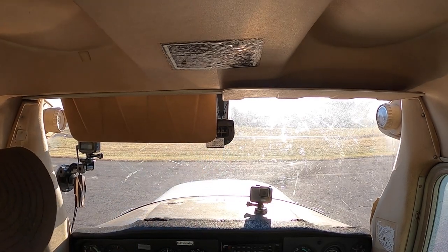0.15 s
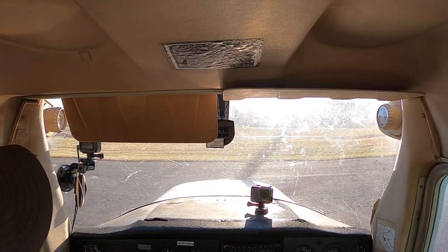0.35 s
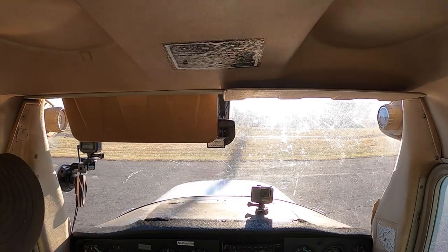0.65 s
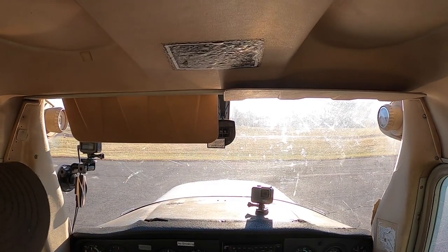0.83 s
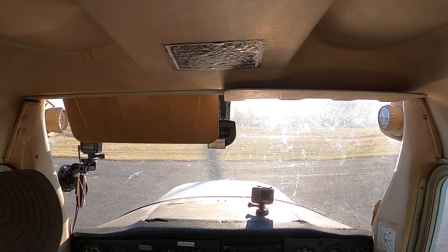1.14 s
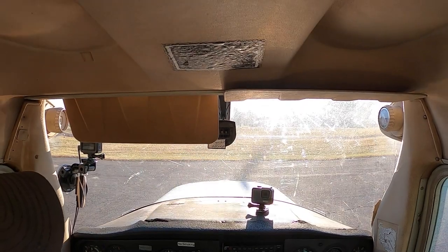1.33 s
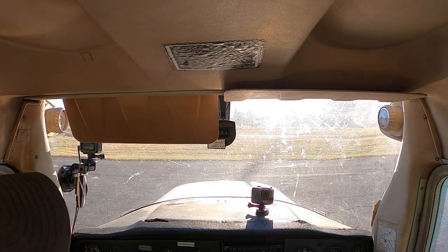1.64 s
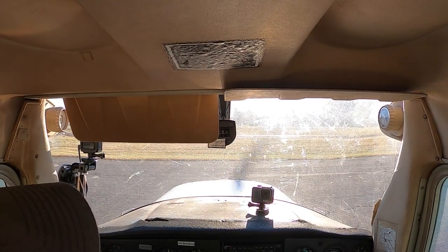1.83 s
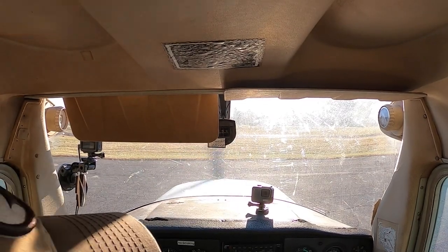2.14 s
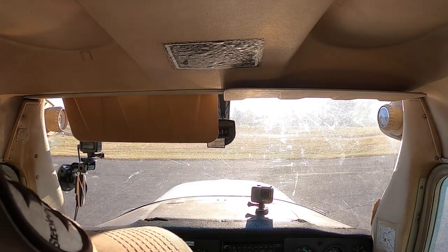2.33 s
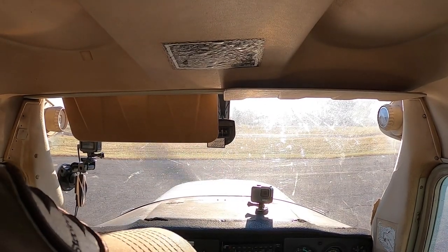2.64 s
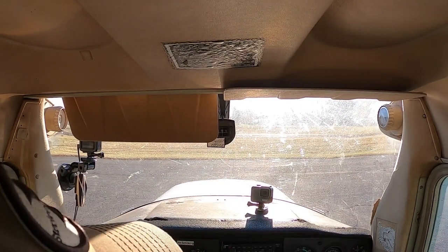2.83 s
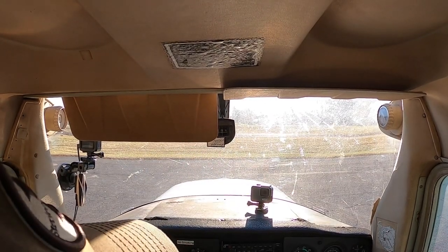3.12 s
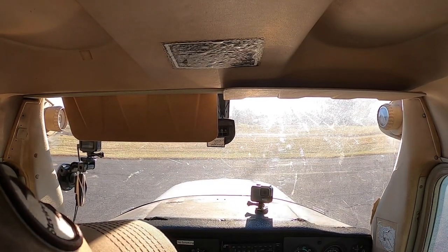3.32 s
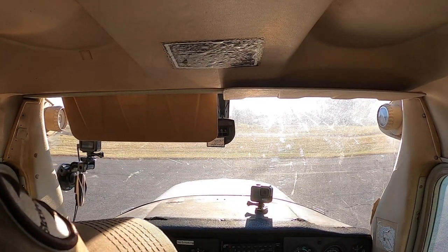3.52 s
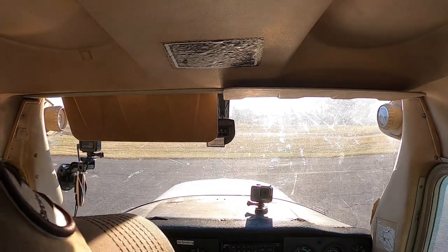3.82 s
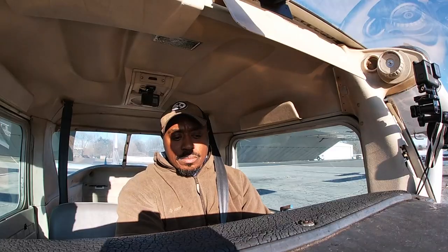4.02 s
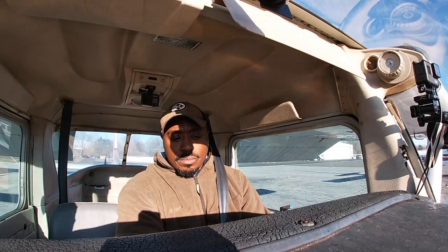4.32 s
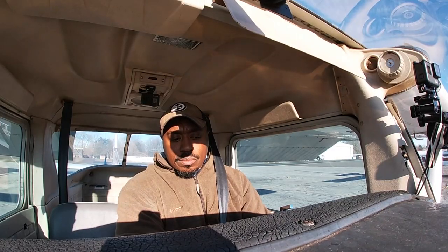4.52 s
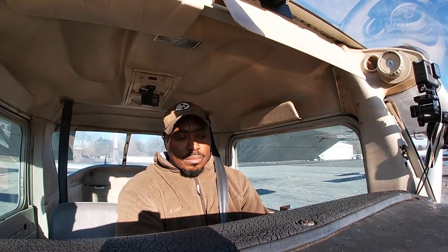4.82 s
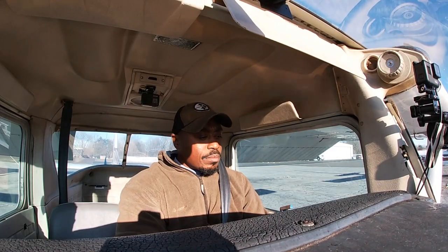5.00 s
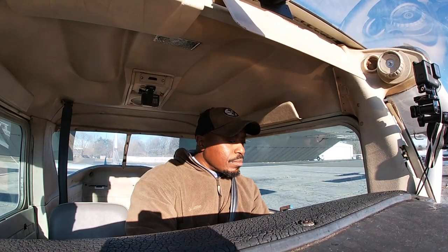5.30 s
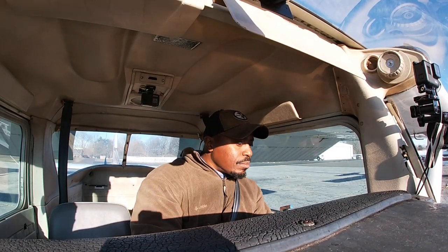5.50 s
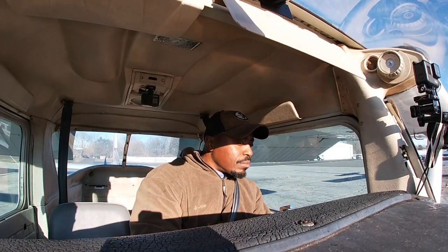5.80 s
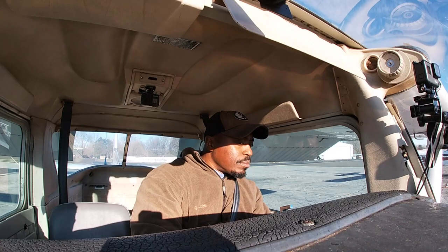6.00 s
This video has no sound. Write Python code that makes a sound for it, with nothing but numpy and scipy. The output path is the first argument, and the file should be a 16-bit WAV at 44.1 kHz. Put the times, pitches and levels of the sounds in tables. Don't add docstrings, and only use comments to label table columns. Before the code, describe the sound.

Heard from inside a small plane's cabin, a brief starter grind gives way at once to uneven, booming first firings with sharp metal clatter. Within a second the engine catches and revs up, the separate thumps merging into a low throbbing drone. It rises gradually to a steady idle with breathy exhaust and propeller wash, faint trim buzzes and a small relay tick about every one and a half seconds. The microphone is close and levelled.

```python
import sys
import numpy as np
from scipy import signal
from scipy.fft import rfft, irfft, next_fast_len
from scipy.io import wavfile
from scipy.ndimage import uniform_filter1d, map_coordinates

SR = 44100
rng = np.random.default_rng(int(sys.argv[2]) if len(sys.argv) > 2 else 0)


def gain_from_db(level_db):
    decades = np.asarray(level_db, float) / 20
    return 10 ** decades


def output_pcm(signal):
    pcm = np.clip(np.atleast_2d(signal).T, -1, 1) * 32767
    wavfile.write(sys.argv[1], SR, np.round(pcm).astype(np.int16))


N = 271215


def drone(rate_hz, turn):
    order_paths = {1: [(12, -38.5), (22, -23.5), (24, -18), (27.6, -37.5), (35.6, -27.5), (40.8, -34),
                   (43.5, -20), (51.5, -25)], 2: [(24, -22), (39, -30), (48, -41), (58, -23.5), (61, -18),
                   (72, -12), (90, -14.5), (103, -14.5)], 3: [(52, -16), (64, -24.5), (80, -20),
                   (102, -40.5), (120, -19.5), (135, -31.5), (149, -26.5), (155, -35)], 4: [(48, -27.5),
                   (77, -33), (110, -22.5), (146, -38.5), (162, -31), (176, -42.5), (196, -31.5),
                   (206, -36)]}
    uneven_paths = {5 / 4: [(36, -33), (43, -49.5), (53, -37), (62.5, -27), (64.5, -31)], 7 / 4: [(50, -40),
                    (58, -33.5), (80, -28.5), (85, -39.5), (89.5, -28.5)], 5: [(150, -40), (180, -43.5),
                    (200, -32), (220, -48.5), (234, -41), (245, -51.5), (256, -37)], 6: [(170, -48.5),
                    (270, -47), (284, -35.5), (298, -56), (309, -40)], 8: [(300, -42.5), (380, -55),
                    (404, -50), (411, -41.5)]}
    # frequency in Hz, level in dB rms.
    quarter_path = [(10, -54.5), (25, -41.5), (60, -43), (120, -44), (200, -44), (330, -62.5)]
    lead_rad = {1: 0, 5 / 4: -2, 7 / 4: 1.6, 2: -.4, 3: 0, 4: .7, 5: -2.7, 6: 2, 8: 2.5}
    floor_hz, floor_width_hz = 151, 3
    slip = 0.7 * np.arctan((3 * rate_hz - floor_hz) / floor_width_hz)
    out = np.zeros(N)
    for order, path in order_paths.items():
        level_db = along(path, order * rate_hz) + 0.3 * order * wobble(14)
        phase = order * turn + lead_rad[order] + 0.028 * order * wobble(11)
        if order == 3:
            phase = phase - slip
        out += gain_from_db(level_db) * np.cos(phase)
    for order, path in uneven_paths.items():
        level_db = along(path, order * rate_hz) + 1.5 * wobble(5.5)
        phase = order * turn + 0.2 * wobble(3) + lead_rad[order]
        out += gain_from_db(level_db) * np.cos(phase) * fade(0.72, 0.91)
    for quarter in range(1, 31):
        if quarter in (4, 5, 7, 8, 12, 16, 20, 24):
            continue
        level_db = along(quarter_path, quarter / 4 * rate_hz) + 4 * wobble(2.7)
        phase = quarter / 4 * turn + 0.8 * wobble(2) + 7 * rng.random()
        out += gain_from_db(level_db) * np.cos(phase)
    lean = np.clip(0.2 + 0.15 * wobble(9), 0, 0.7) * fade(1.8, 3.2)
    dip = 1 - lean * (np.exp(4 * (np.cos(turn / 4 + 1) - 1)) - 0.2)
    return np.sqrt(2) * out * dip


def roar(turn):
    # time in seconds, level in dB over the first idle.
    load = [(.6, -1), (1.2, 0.5), (1.9, 1.5), (2.8, 3), (3.4, 3), (4.2, 4.5), (4.8, 6.5), (5.5, 6.5),
            (6.15, 6.5)]
    load_db, = curves(load)
    shared = wobble(5.1)
    puff = 1 + 0.12 * np.cos(turn - 1.2) + 0.16 * np.cos(2 * turn) + 0.02 * np.cos(turn / 4)
    low = exhaust(load_db, shared) + rumble(load_db)
    flow = puff * low + np.sqrt(puff) * propwash(load_db, shared) + leak(load_db, shared)
    return fade(0.25, 0.65) * flow


def exhaust(load_db, shared):
    # frequency in Hz, level in dB per Hz.
    spectrum = [(150, -44), (260, -9), (366, -3), (477, -7), (515, -6), (724, -12), (795, -18), (859, -12),
                (1400, -22), (2000, -31), (2600, -62.5), (4400, -120)]
    # frequency in Hz, width in Hz, level in dB above the roar.
    panels = [(521, 30, 4), (718, 25, 5.5), (865, 45, 3.5), (1400, 60, 4)]
    # centre in seconds, half length in seconds, lift in dB.
    surges = [
        (.43, .09, 17),
        (0.664, .04, 2.5),
        (.8, 0.11, 9),
        (1.556, .12, 3),
    ]

    def panel_gain(f):
        return 1 + sum((gain_from_db(db) - 1) / (1 + (2 * (f - c) / w) ** 2) for c, w, db in panels)

    surge_db = sum(swell(*row) for row in surges)
    level_db = -37.5 + load_db + surge_db
    bright_db = 0.37 - surge_db
    jet = unit(filtered(noise(spectrum, patchy_db=-0.54), panel_gain))
    high = filtered(jet, lambda f: 1 / (1 + (700 / (f + 1)) ** 4))
    jet = jet + (gain_from_db(bright_db) - 1) * high
    return jet * gain_from_db(level_db + 0.053 * shared + 0.11 * wobble(60))


def rumble(load_db):
    # frequency in Hz, level in dB per Hz.
    airframe = [(2, -12), (24, -3), (60, 12), (130, 11), (175, -6), (230, -32.5), (400, -120)]
    # frequency in Hz, level in dB per Hz.
    floor = [(90, -120), (150, -7), (200, 0.5), (280, -9.5), (350, -11.5), (500, -120)]
    # time in seconds, rumble level in dB.
    settling = [(.45, -16.5), (.9, -18), (1.2, -32.5), (2.2, -31.5), (6.15, -27.5)]
    # centre in seconds, half length in seconds, change in dB.
    lull = (2.0, .45, -7)
    settle_db, = curves(settling)
    throb_db = -33.5 + 0.49 * load_db + swell(*lull) + 4 * (1 - fade(0.63, 1.0))
    shaking = noise(airframe) * gain_from_db(settle_db + 0.7 * wobble(3))
    return shaking + noise(floor) * gain_from_db(throb_db + 0.5 * wobble(9))


def propwash(load_db, shared):
    # frequency in Hz, level in dB per Hz.
    hiss = [(1100, -35), (1900, -5), (2200, -7), (2880, -7.5), (3500, -12), (4200, -20.5), (6000, -56.5),
            (9000, -120)]
    # frequency in Hz, level in dB per Hz.
    skin = [(2500, -57), (3600, -4.5), (4200, 0), (5500, 0.5), (6000, -6.5), (7000, -18), (9000, -60.5),
            (12000, -120)]
    hiss_db = -58.5 + 0.55 * load_db + 0.87 * shared + 0.37 * wobble(40)
    skin_db = -61.5 + 0.1 * load_db + 0.24 * shared + 1.1 * wobble(70)
    return noise(hiss, patchy_db=1.5) * gain_from_db(hiss_db) + noise(skin, patchy_db=1) * gain_from_db(skin_db)


def leak(load_db, shared):
    # frequency in Hz, level in dB per Hz.
    spectrum = [(4120, -35), (7000, -5), (8510, -2), (9410, 0), (12000, -5), (14500, -16)]
    level_db = -71.5 + 0.5 * load_db + 0.4 * shared + 0.9 * wobble(50)
    return noise(spectrum, patchy_db=1.2) * gain_from_db(level_db)


def catch():
    # frequency in Hz, width in Hz, level in dB.
    shell = [(71.4, 32, -1.5), (113, 21, 3), (143, 45, -2), (180, 17.7, 2), (216.5, 46, -4),
             (290, 54.6, -18.5)]
    # frequency in Hz, level in dB per Hz.
    bang_spectrum = [(150, -29.5), (260, 0), (372, -0.5), (565, -9), (643, -10.5), (936, -9), (1170, -19.5),
                     (2000, -28.5), (2600, -36), (4400, -120)]
    # frequency in Hz, level in dB per Hz.
    clatter_spectrum = [(710, -20), (1200, -5.5), (1520, -10), (1840, -10.5), (2450, -13), (2780, -10.5),
                        (4080, -16.5), (5290, -16.5), (7000, -36.5), (9100, -65), (15400, -120)]
    # frequency in Hz, level in dB per Hz.
    jingle_spectrum = [(4500, -39), (6000, -1.5), (7000, -7), (8500, -2.5), (10400, -7), (12300, -7.5),
                       (13200, -31), (15500, -38.5), (17000, -120)]

    def airframe(f):
        return resonances(shell)(f) / (1 + 1j * f / 350) ** 3

    grind = gain_from_db(-37.5) * (1 - fade(0.037, 0.3))
    jingle_db = -60.5 - 178 * np.clip(np.arange(N) / SR - 0.46, 0, 1)
    clump = wobble(60.9)
    thumps = rng.standard_normal(N) * gain_from_db(1.8 * wobble(70.2))
    boom = unit(filtered(thumps, airframe)) * (kicks(column=1, t60=0.45) + 3 * grind)
    bang = noise(bang_spectrum, patchy_db=-2.5) * (kicks(column=2, t60=0.75) + 1.4 * grind)
    bang *= gain_from_db(0.8 * clump)
    metal = noise(clatter_spectrum, patchy_db=-0.5)
    clatter = metal * (kicks(column=3, t60=0.54) + 1.13 * grind)
    clatter *= gain_from_db(-8.0 + 0.7 * clump + 2.4 * wobble(251))
    jingle = noise(jingle_spectrum) * gain_from_db(jingle_db + 2.0 * wobble(140))
    return (boom + bang + clatter + jingle + cracks(metal)) * (1 - fade(0.39, 0.68))


def kicks(column, t60):
    # start in seconds, boom in dB, bang in dB, clatter in dB.
    firings = [
        (0.038, -14.5, -27, -35.5),
        (0.12, -11.5, -25.5, -30.5),
        (.18, -20, -28, -38.5),
        (.25, -16, -27.5, -35),
        (0.291, -11.5, -23.5, -33),
        (0.373, -14, -21, -34),
        (.44, -14, -36, -38.5),
        (.51, -20, -37, -39.5),
    ]
    power = np.zeros(N)
    for row in firings:
        t = np.clip(np.arange(SR) / SR - row[0], 0, None)
        rise = 1 - np.exp(-t / 0.0095)
        power[:SR] += (gain_from_db(row[column] + 3 - 60 * t / t60) * rise) ** 2
    return np.sqrt(power)


def cracks(metal):
    # start in seconds, peak level in dB, level of the snap in dB.
    blows = [(.0345, -28.5, -37), (0.0408, -7.5, -34.5), (0.045, -17, -44), (.071, -36, -42),
             (0.121, -30.5, -6.5), (0.1304, -30.5, -11), (0.1464, -28, -16), (0.1884, -22, -27),
             (0.2379, -33, -31), (0.2744, -46.5, -13), (0.3152, -24, -30), (.333, -20.5, -37),
             (.345, -25, -33), (0.3594, -29.5, -25), (0.3894, -30.5, -29), (.399, -30, -32.5)]
    # frequency in Hz, width in Hz, level in dB.
    cowl = [(1290, 2600, 5.5), (3070, 280, 10), (3760, 330, 0)]
    # frequency in Hz, level in dB per Hz.
    snap_spectrum = [(3500, -35), (6000, -4), (7500, -7), (8700, 0), (11000, -8), (13200, -13),
                     (14900, -14), (15600, -30), (17000, -120)]
    snap = noise(snap_spectrum)
    ringing = unit(filtered(metal, resonances(cowl)))
    t = np.arange(SR // 10) / SR
    rise = 1 - np.exp(-t / 0.00027)
    out = np.zeros(N)
    for start, db, snap_db in blows:
        at = slice(round(start * SR), round(start * SR) + len(t))
        body = (ringing[at] + 0.26 * metal[at]) * gain_from_db(-60 * t / 0.066)
        bright = snap[at] * gain_from_db(snap_db + 13.0 - 60 * t / 0.053)
        out[at] += gain_from_db(db - 16.5) * rise * (body + bright)
    return out


def rings():
    # centre in seconds, half length in seconds, frequency in Hz, dB
    modes = [(0.029, 0.14, 65, -18), (0.058, 0.039, 227, -17.5), (0.092, 0.05, 112, -21),
             (0.133, 0.033, 165, -17), (0.246, 0.058, 182.3, -20), (0.379, 0.28, 113, -19.5),
             (0.38, 0.14, 180, -24.5), (0.473, 0.048, 237.6, -25.5), (0.602, 0.14, 239.6, -33.5),
             (0.795, 0.07, 240, -31), (0.846, 0.061, 1056, -45.5), (5.63, 0.081, 2480, -62.5),
             (.71, 0.076, 85, -19.5), (0.693, .1, 113, -23.5)]
    out = np.zeros(N)
    sway_db, drift_rad = 1.5 * wobble(30), 0.5 * wobble(15.3)
    for centre, length, hz, db in modes:
        at = np.arange(max(0, round((centre - length) * SR)), round((centre + length) * SR))
        bell = np.cos(np.pi * np.clip((at / SR - centre) / (1.7 * length), -0.5, 0.5)) ** 2
        phase = 2 * np.pi * hz * at / SR + drift_rad[at] + 7 * rng.random()
        out[at] += gain_from_db(db + 5 + sway_db[at]) * bell * np.sin(phase)
    return out


def trim():
    # start in seconds, peak level in dB.
    rattles = [(0.5216, -54), (.6969, -62), (0.9814, -54.5), (1.0796, -53), (2.153, -60), (2.163, -66),
               (2.256, -59), (2.849, -61), (3.6731, -58), (3.97, -56), (5.6792, -56), (5.7978, -54),
               (5.857, -53.5), (5.9751, -56)]
    buzz = noise([(2500, -30), (5000, 4), (7000, -7), (9500, -9), (12500, -18), (14000, -52.5)])
    draw = rng.random((int(22 * 5.5), 2))
    faint = [(0.55 + 5.5 * when, -69 + 8 * size) for when, size in draw]
    t = np.arange(SR // 40) / SR
    out = np.zeros(N)
    for start, db in [*rattles, *faint]:
        at = slice(round(start * SR), round(start * SR) + len(t))
        out[at] += gain_from_db(db - 60 * t / 0.05) * buzz[at]
    return out


def pings():
    t = np.arange(SR // 25) / SR
    rise = 1 - np.exp(-t / 0.0038)
    out = np.zeros(N + SR)
    for when, pitch, size, life in rng.random((170, 4)):
        hz, t60 = 2700 + 3000 * pitch ** 0.6, 0.03 + 0.05 * life
        ring = np.sin(2 * np.pi * hz * t) * rise
        out[round((0.5 + 5.6 * when) * SR):][:len(t)] += gain_from_db(-62 + 7 * size - 60 * t / t60) * ring
    return out[:N]


def relay():
    # start in seconds, peak level in dB, case knock in dB rms.
    ticks = [
        (1.4296, -39, -51),
        (2.8759, -39, -51),
        (4.3226, -39, -48),
        (5.7603, -39, -51),
    ]
    # frequency in Hz, width in Hz, level in dB.
    modes = [(8300, 740, 0.5), (10280, 1500, -9), (12800, 1600, -1.5), (15000, 1300, -8)]
    # frequency in Hz, level in dB per Hz.
    case = [(900, -60), (1400, -3), (2300, 0), (4000, -5), (5500, -6), (7000, -22), (12000, -24),
            (14500, -45), (16000, -120)]
    blows, knock = np.zeros(N), np.zeros(N)
    t = np.arange(SR // 10) / SR
    decay = gain_from_db(2.5 - 60 * t / 0.0094) + gain_from_db(-60 * t / 0.23)
    for start, db, knock_db in [(0.002, -50, -66), *ticks]:
        blows[round((start + 0.001) * SR)] = gain_from_db(db + 18.5)
        knock[round((start + 0.0015) * SR):][:len(t)] = gain_from_db(knock_db) * decay
    return filtered(blows, resonances(modes)) + knock * noise(case)


def unit(x):
    return x / np.sqrt(np.mean(x ** 2) + 1e-20)


def along(points, hz):
    f, db = np.transpose(points)
    return np.interp(np.log(hz + 1), np.log(f + 1), db)


def curves(rows):
    seconds, *columns = np.transpose(rows)
    return [np.interp(np.arange(N) / SR, seconds, c) for c in columns]


def wobble(rate):
    coarse = np.arange(0, N + 16, 16)
    knots = rng.standard_normal(int(N * rate / SR) + 4)
    return np.interp(np.arange(N), coarse, map_coordinates(knots, [coarse * rate / SR]))


def filtered(x, response):
    m = next_fast_len(N + SR // 2)
    return irfft(rfft(x, m) * response(np.fft.rfftfreq(m, 1 / SR)), m)[:N]


def noise(spectrum, patchy_db=0):
    z = signal.stft(rng.standard_normal(N), nperseg=512)[2]
    field = uniform_filter1d(rng.standard_normal(z.shape), size=5, axis=0)
    field = uniform_filter1d(field, size=8, axis=1)
    white = signal.istft(z * gain_from_db(patchy_db * unit(field)), nperseg=512)[1][:N]
    return unit(filtered(white, lambda hz: gain_from_db(along(spectrum, hz))))


def resonances(modes):
    def response(f):
        total = 0
        for k, (c, w, db) in enumerate(modes):
            total = total + (-1) ** k * gain_from_db(db) * 1j * f * w / (c * c - f * f + 1j * f * w)
        return total
    return response


def fade(start, end):
    return np.clip((np.arange(N) / SR - start) / (end - start), 0, 1)


def swell(centre, half, db):
    return db * np.exp(-np.clip((np.arange(N) / SR - centre) / half, -5, 5) ** 2)


def scene():
    # time in seconds, firing rate in Hz.
    firing = [(0, 12), (.16, 12.4), (.24, 14.1), (.32, 19.2), (.4, 22.5), (.64, 27.3), (.88, 32.9),
              (1.16, 37.5), (1.4, 40.8), (1.64, 42.9), (1.9, 44.4), (2.4, 46.8), (3, 48.5), (3.6, 50),
              (4.4, 50.8), (5.2, 51.05), (6.15, 51.55)]
    rate_hz, = curves(firing)
    turn = 2.0 + 2 * np.pi * np.cumsum(rate_hz) / SR
    engine = drone(rate_hz, turn) + roar(turn) + catch() + rings()
    return (engine + trim() + pings() + relay())[None]


def low_pass(x):
    return signal.sosfilt(signal.butter(12, 15710, fs=SR, output="sos"), x)


def record(dry):
    power = uniform_filter1d(dry ** 2, SR // 20, axis=1, mode="reflect")
    level = np.sqrt(np.abs(power) + 1e-6)
    x = dry * (level / 0.25) ** -0.3
    x = x / (1 + np.abs(x / 0.72) ** 5) ** (1 / 5) - 0.0027
    return low_pass(x)


dry = scene()
out = record(dry)
output_pcm(out)
```